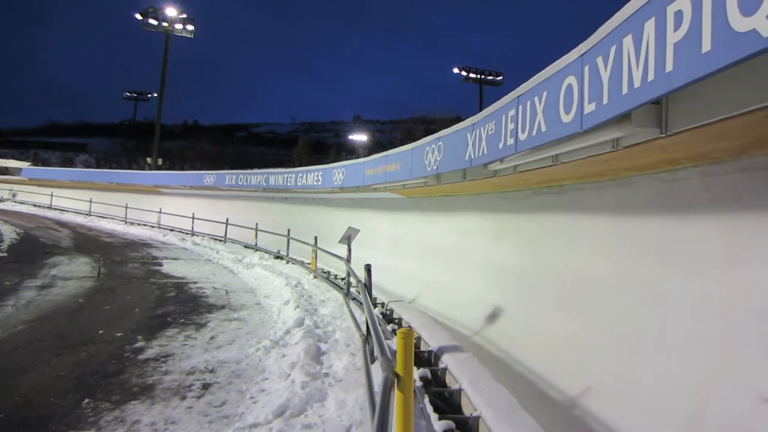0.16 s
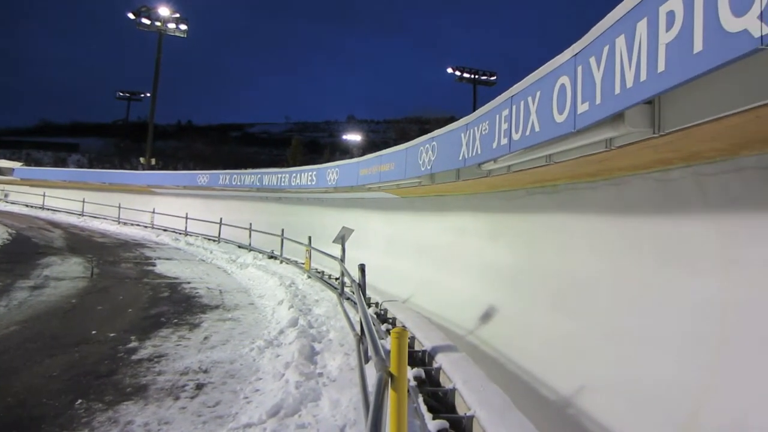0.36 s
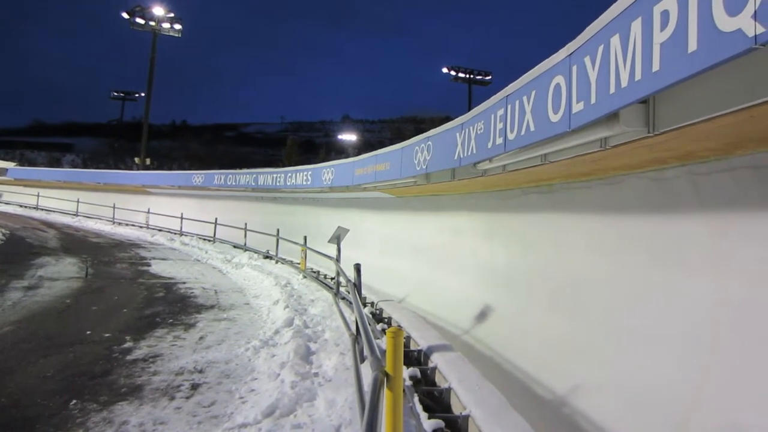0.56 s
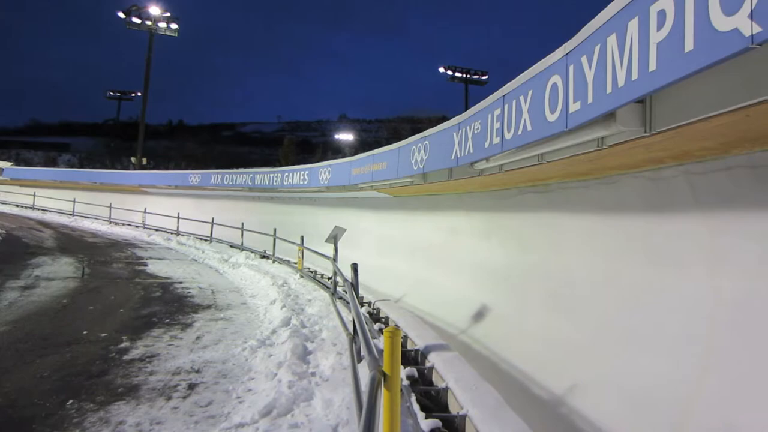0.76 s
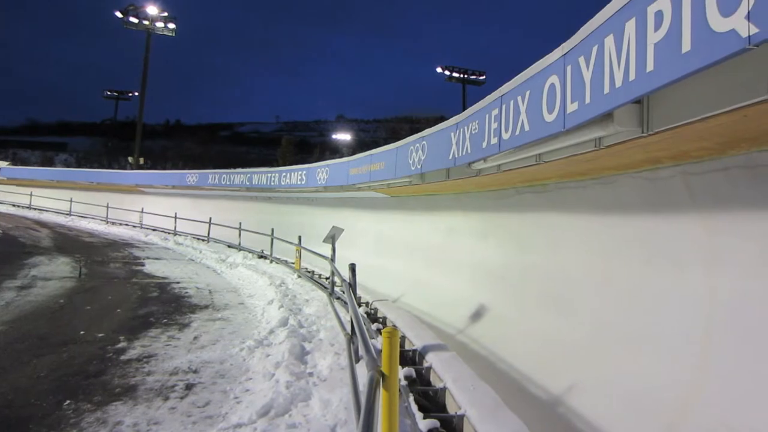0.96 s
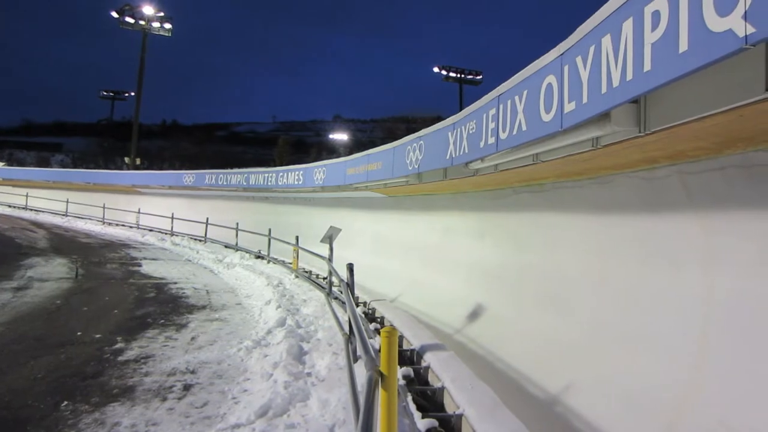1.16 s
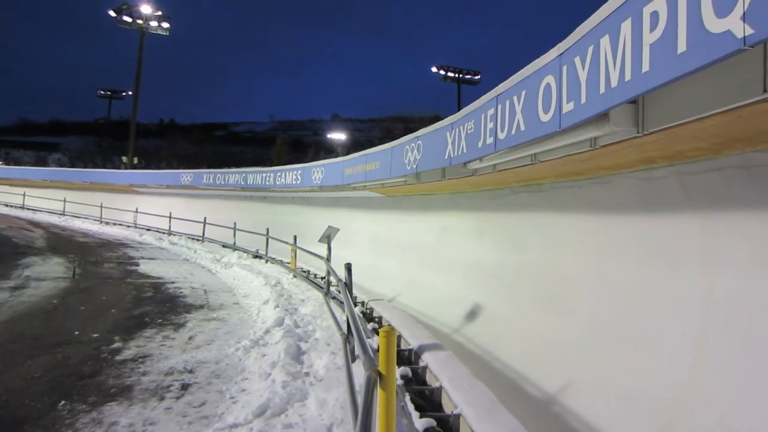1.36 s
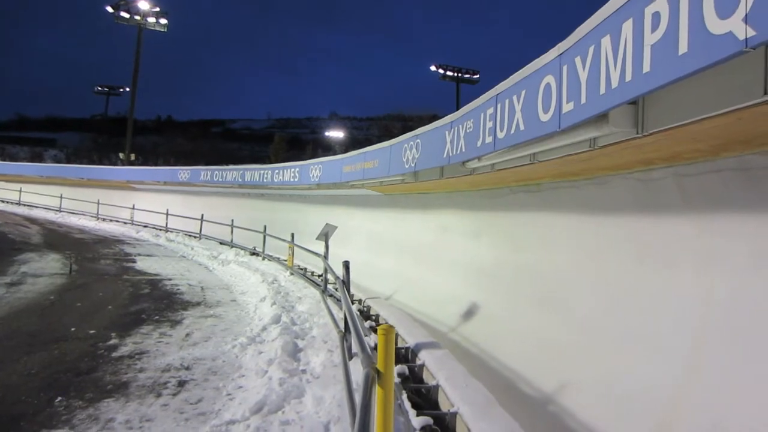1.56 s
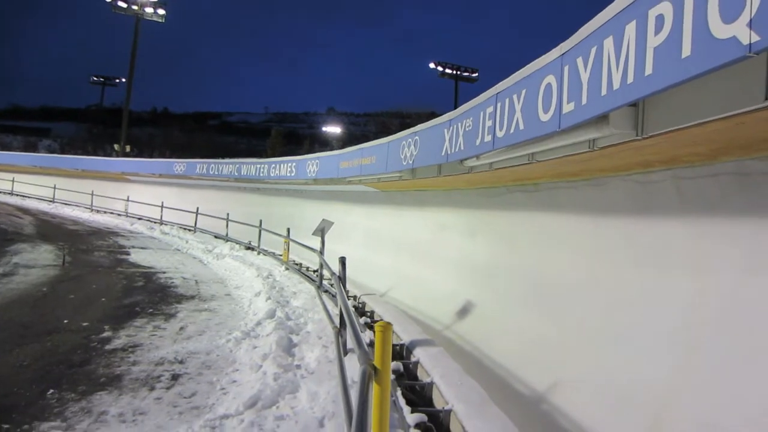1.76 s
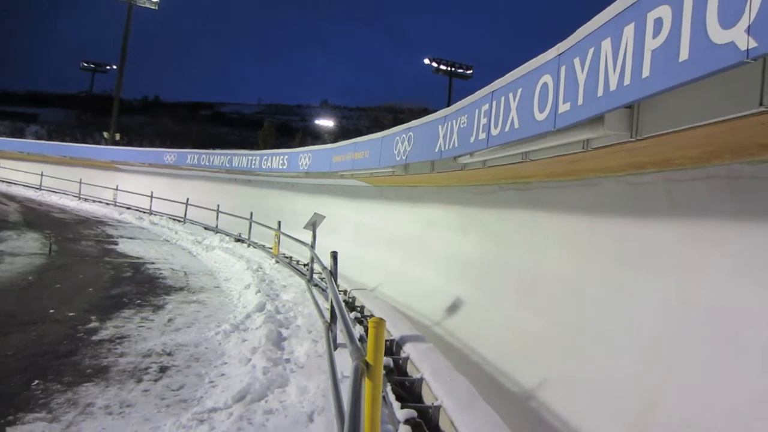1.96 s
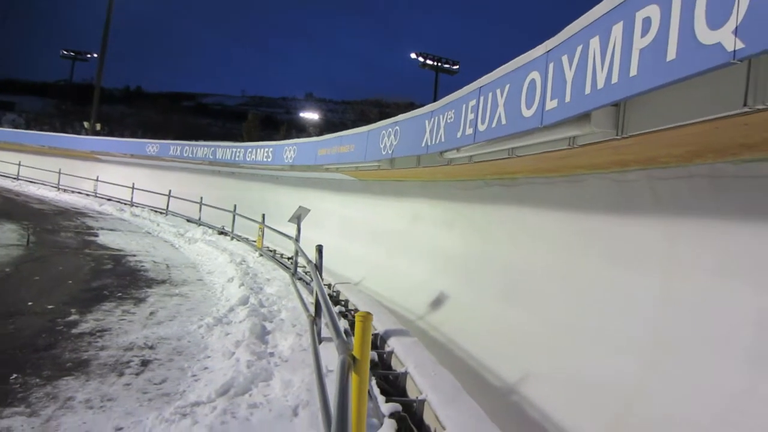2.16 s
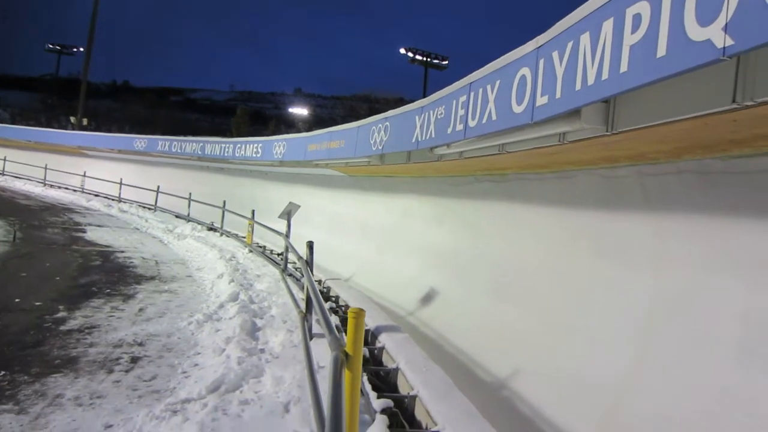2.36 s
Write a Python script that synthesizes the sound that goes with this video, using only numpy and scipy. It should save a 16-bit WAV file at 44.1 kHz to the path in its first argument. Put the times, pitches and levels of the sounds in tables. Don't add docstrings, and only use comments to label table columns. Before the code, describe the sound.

Loud bobsled roar and scraping steel runners recede round an icy bend, with dull booms

```python
import sys
import numpy as np
from scipy import signal
from scipy.fft import rfft, irfft, next_fast_len
from scipy.io import wavfile
from scipy.ndimage import uniform_filter1d

SR = 44100
rng = np.random.default_rng(int(sys.argv[2]) if len(sys.argv) > 2 else 0)


def int16_out(signal):
    q = np.round(np.clip(np.atleast_2d(signal).T, -1, 1) * 32767)
    wavfile.write(sys.argv[1], SR, q.astype(np.int16))


def how_loud(loudness_db):
    steps = np.asarray(loudness_db, float) / 20
    return 10 ** steps


N = 110117

HOP, SIZE = 128, 512
TIME = np.arange(N // HOP + 5) * HOP / SR
FREQ = np.fft.rfftfreq(SIZE, 1 / SR)[:, None]


def evened(x):
    return x / np.sqrt(np.mean(x ** 2) + 1e-20)


def read(points, hz):
    f, value = np.transpose(points)
    return np.interp(np.log(hz + 1), np.log(f + 1), value)


def flat(spectrum_db):
    return spectrum_db - 10 * np.log10(np.sum(how_loud(2 * spectrum_db))) - 1.5


def smoothed(field, bands, frames):
    return evened(uniform_filter1d(uniform_filter1d(field, size=bands, axis=0), size=frames, axis=1))


def hiss(gain, patchy_db, flicker_db):
    real, imaginary, p = rng.standard_normal((len(TIME), len(FREQ), 3)).T
    patches = smoothed(p, bands=6, frames=16)
    flicker = smoothed(p, bands=70, frames=2)
    unevenness = how_loud(patchy_db * patches + flicker_db * flicker)
    spectra = (real + 1j * imaginary) * gain * unevenness
    return signal.istft(spectra, nperseg=SIZE, noverlap=SIZE - HOP)[1][:N]


def resonate(x, hz, width):
    turn = np.exp(2j * np.pi * np.cumsum(hz * np.ones(len(x))) / SR)
    r = np.exp(-np.pi * width / SR)
    return 2 * (turn * signal.lfilter([1 - r], [1, -r], x / turn)).real


def fuzzy_note(length, hz, width, second_width):
    return resonate(resonate(rng.standard_normal(length), hz, width), hz, second_width)


def add(mix, s, sound):
    part = mix[round(s * SR):][:len(sound)]
    part += sound[:len(part)]


# (time [s], heard level [dB], runner pressure [dB], track drone [dB])
RUN = [(0, -14.5, 6, -31.5), (.12, -13.5, -2.5, -32), (.3, -16, 4, -30.5), (.42, -17, 1.5, -35.5),
       (.56, -20, 0.5, -41), (.64, -19.5, 0.5, -59), (.75, -19, 1, -31), (.9, -17, 3.5, -43.5),
       (1.1, -21.5, 8.5, -43), (1.2, -23.5, 3, -45), (1.3, -26.5, 5.5, -45), (1.4, -25, 3, -34.5),
       (1.55, -27.5, 0.5, -40.5), (1.75, -32, 5.5, -43.5), (1.93, -32.5, 1.5, -44.5), (2.08, -36, 3, -50.5),
       (2.25, -32.5, -2, -45.5), (2.5, -33, -10, -40)]


def control(t, order):
    return np.interp(t, np.array(RUN)[:, 0], np.array(RUN)[:, order])


# (frequency [Hz], density [dB per Hz])
HULL = [(20, -44), (70, -15.5), (140, -9.5), (320, -3), (600, -3), (1050, -5.5), (1500, -10.5), (4000, -29)]
# (frequency [Hz], density [dB per Hz])
ICE = [(300, -41.5), (1200, -16.5), (2000, -19.5), (3200, -27.5), (4500, -37.5), (7500, -42), (10000, -58),
       (16000, -35)]


def sled():
    level, pressure, grit = control(TIME, order=1), control(TIME, order=2), skids()
    octaves_up = np.log2(np.maximum(FREQ, 400) / 400)
    dull = 0.0926 * (level - level.max()) * octaves_up
    hull_db = read(HULL, FREQ)
    shift = flat(hull_db) - hull_db
    hull_gain = grit * how_loud(hull_db + shift + level + dull)
    ice_gain = grit * how_loud(read(ICE, FREQ) + shift + level + 0.11 * dull + pressure)
    hull = hiss(hull_gain, patchy_db=.7, flicker_db=.6)
    ice = hiss(ice_gain, patchy_db=1.9, flicker_db=0.73)
    return hull + ice


# (middle [s], length [s], rise above the steady roar [dB], grit centre [Hz], spread [octaves])
SKIDS = [(.017, .035, 3, 6500, 1.1), (.047, .012, 9, 4000, 1.1), (.066, .022, 9, 4000, 1.1),
         (.112, .04, 4, 5000, 1.1), (.143, .018, 8, 2500, 2.4), (.163, .022, 11.5, 4000, 2.),
         (.224, .03, 7, 4800, 1.2), (.287, .012, 9, 13500, .35), (.357, .024, 7, 7000, .7),
         (.388, .024, 4, 6500, .8), (.428, .024, 4, 4000, 1.2), (.515, .06, 6.5, 4500, 1.8),
         (.7, .055, 7, 4000, 1.7), (.748, .05, 10, 2600, 2.2), (.815, .025, 6, 7200, 1.1),
         (.868, .04, 7, 2500, .6), (.12, .5, 2.5, 800, .7), (1.088, .05, 7, 3200, 1.1),
         (1.148, .045, 9, 2800, 1.), (1.385, .03, 4.5, 2600, 1.3), (1.45, .06, 5, 2500, 1.1),
         (1.785, .035, 3, 7200, .8), (1.92, .05, 4, 4500, 1.4), (2.075, .03, 3, 3500, 1.2)]


def skids():
    rise = .4
    power = np.ones((len(FREQ), len(TIME)))
    for s, length, db, hz, octaves in SKIDS:
        u = (TIME - s) / length
        skewed = np.where(u < 0, u / (2 * rise), u * 2 * rise)
        swell = np.exp(-8 * skewed ** 2)
        band = np.exp(-(np.log2((FREQ + 20) / hz) / octaves) ** 2)
        power += (how_loud(2 * db) - 1) * band * swell
    return np.sqrt(power)


def drone():
    far_hz, near_hz, drop_s, width_hz = 124, 144, .45, 25
    t = np.arange(N) / SR
    hz = far_hz + (near_hz - far_hz) * np.exp(-(t / drop_s) ** 2)
    fuzz = evened(fuzzy_note(N, hz, width_hz, 2 * width_hz))
    tone = np.sin(2 * np.pi * np.cumsum(hz) / SR)
    return evened(0.97 * fuzz + 1.02 * tone) * how_loud(control(t, order=3))


# (time [s], ring [Hz], level [dB], fall by 60 dB [s])
KNOCKS = [
    (.137, 692, -6.5, 0.066),
    (.27, 206, -15, 0.29),
    (0.366, 251, -12, 0.21),
    (.57, 229.5, -21.5, 0.34),
    (0.751, 381, -9.5, 0.083),
    (1.17, 256, -21, 0.18),
    (1.899, 233, -34, 0.21),
    (2.384, 311, -32, 0.3),
]


def knocks():
    out, t = np.zeros(N), np.arange(SR // 3) / SR
    for s, hz, db, t60 in KNOCKS:
        fuzz = evened(fuzzy_note(len(t), hz, .3 * hz, .3 * hz))
        ring = .8 * np.sin(2 * np.pi * hz * t) + .5 * fuzz
        onset = np.minimum(t * hz / 4, 1)
        add(out, s, ring * onset * how_loud(db - 60 * t / t60))
    return out


# (time [s], level [dB], ring [Hz])
CRUMBS = [
    (1.54, -36, 7400),
    (1.618, -37, 7400),
    (1.91, -37, 7900),
    (2.1, -46, 10400),
    (2.255, -40, 4100),
    (2.285, -37, 12400),
    (2.36, -45, 12400),
]


def crumbs():
    out, t = np.zeros(N), np.arange(400) / SR
    for s, db, hz in CRUMBS:
        add(out, s, np.sin(2 * np.pi * hz * t) * how_loud(db - 60 * t / .0015))
    return out


def still_air():
    level_db, tilt_db = -64, 6
    spectrum_db = level_db + flat(tilt_db * np.log2(FREQ + 60))
    return hiss(how_loud(spectrum_db + 0 * TIME), patchy_db=.5, flicker_db=.5)


def whine():
    hz, level_db = 15650, -97
    return how_loud(level_db) * evened(fuzzy_note(N, hz, 45, 65))


def scene():
    return (sled() + drone() + knocks() + crumbs())[None]


# (frequency [Hz], gain [dB])
MIC = [(20, 10.5), (8600, -6), (10400, -17), (11500, -28), (12500, -28), (13500, -21), (14800, -37),
       (15700, -26)]


def microphone(sound):
    size = next_fast_len(N + 4096)
    gain = how_loud(read(MIC, np.fft.rfftfreq(size, 1 / SR)))
    return irfft(rfft(sound, size) * gain, size)[:, :N]


def low_pass(x):
    return signal.sosfilt(signal.butter(12, 15730, fs=SR, output="sos"), x)


def record(dry):
    heard = microphone(dry + still_air())
    return low_pass(heard + whine())


dry = scene()
out = record(dry)
int16_out(out)
```